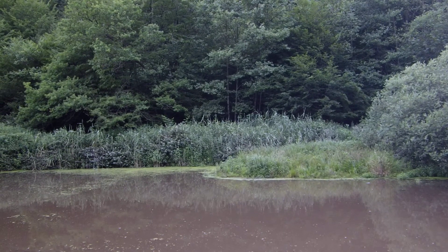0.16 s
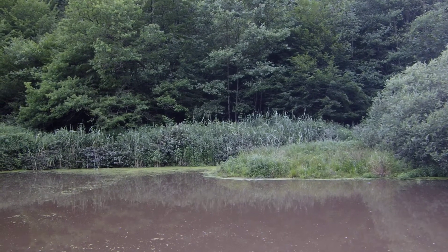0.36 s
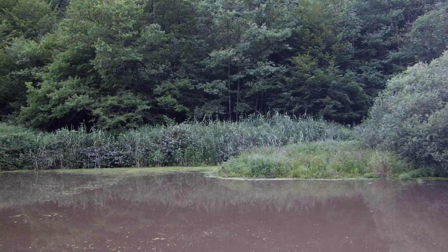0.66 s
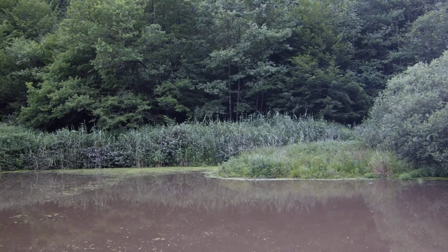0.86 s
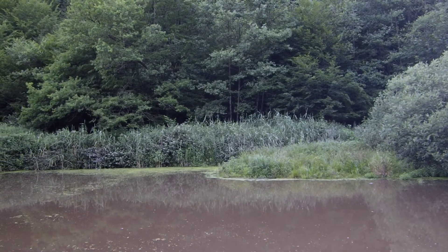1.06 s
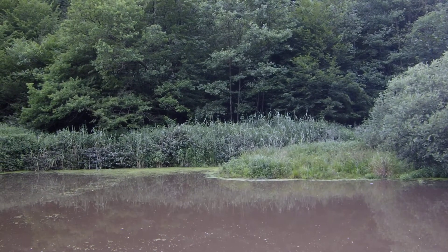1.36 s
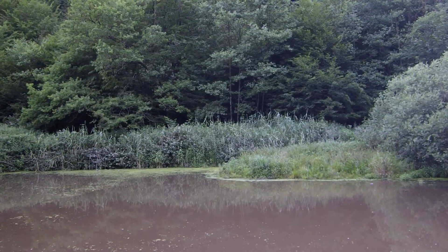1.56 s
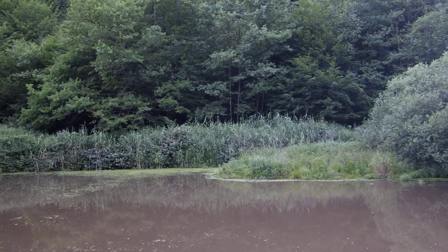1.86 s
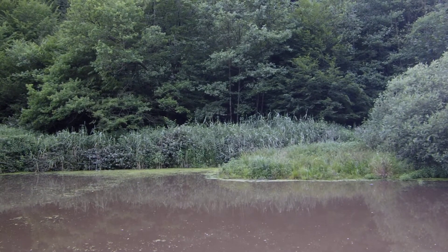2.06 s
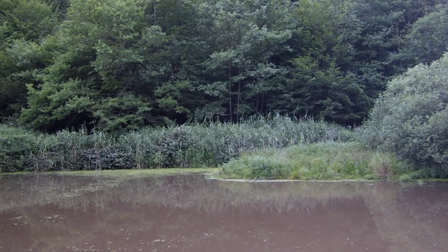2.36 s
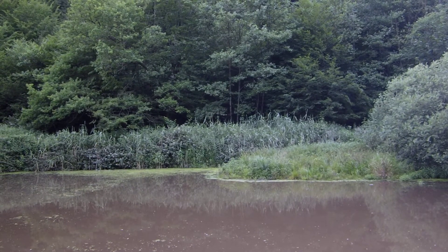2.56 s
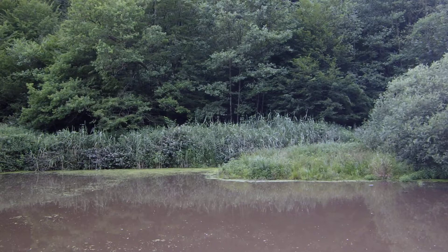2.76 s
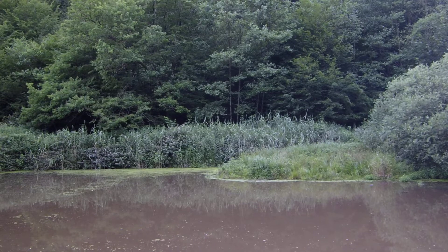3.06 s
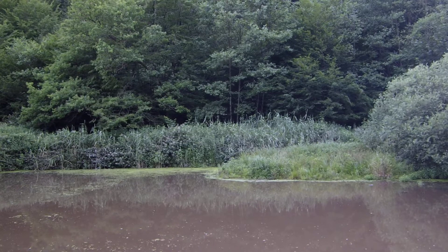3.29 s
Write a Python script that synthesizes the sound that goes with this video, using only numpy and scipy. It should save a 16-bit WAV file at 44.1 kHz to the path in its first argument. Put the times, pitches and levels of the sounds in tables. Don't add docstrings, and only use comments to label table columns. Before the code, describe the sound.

A mole cricket churrs steadily and loudly close by at a pond edge, faint birds behind

```python
import sys
import numpy as np
from scipy import signal
from scipy.fft import rfft, irfft
from scipy.io import wavfile
from scipy.ndimage import uniform_filter1d

SR = 44100
rng = np.random.default_rng(int(sys.argv[2]) if len(sys.argv) > 2 else 0)


def transcribe(signal):
    frames = np.atleast_2d(signal).T
    limited = np.clip(frames, -1, 1)
    pcm = np.round(limited * 32767).astype(np.int16)
    wavfile.write(sys.argv[1], SR, pcm)


def how_loud(loudness_db):
    steps = np.asarray(loudness_db, float) / 20
    return 10 ** steps


N = 151263
T = np.arange(N) / SR


def walk(rate):
    hold = int(SR / rate)
    held = np.repeat(rng.standard_normal(N // hold + 1), hold)
    return 1.3 * uniform_filter1d(uniform_filter1d(held, hold), hold)[:N]


def scatter(x, t60, wet_db):
    t = T[:SR // 2]
    tail = rng.standard_normal(len(t)) * how_loud(-60 * t / t60) * (t > .004)
    tail = tail / np.sqrt(np.sum(tail ** 2))
    return x + how_loud(wet_db) * signal.fftconvolve(x, tail)[:N]


def air_and_hiss():
    # f/Hz, level/dB per Hz
    air_points = [(25, -85), (120, -95), (400, -103), (1100, -106), (1400, -103), (2150, -103),
                  (2300, -108), (2800, -109)]
    # f/Hz, level/dB per Hz
    hiss_points = [(3600, -107), (4300, -115), (5000, -124), (6200, -123), (8000, -123), (10000, -119),
                   (13600, -116), (15700, -120)]
    swell_db, flicker_db = .3, .8
    whine_hz, whine_db = 9232, -87
    top_hz = 15745

    hz = np.maximum(np.fft.rfftfreq(N, 1 / SR), 1)
    point_hz, point_db = np.concatenate([np.array(air_points), np.array(hiss_points)]).T
    colour = how_loud(np.interp(np.log(hz), np.log(point_hz), point_db) + 18) * np.sqrt(SR / 2)
    colour = colour * hz / (hz + 12) * (hz < top_hz)
    noise = rfft(rng.standard_normal(N)) * colour

    out, swell = 0, walk(0.46)
    for octave in range(11):
        distance = np.clip(np.log2(hz / 20) - octave, -1 if octave else 0, 1)
        part = np.cos(np.pi / 2 * distance) ** 2
        outdoors = 1 / (1 + (20 * 2 ** octave / 5000) ** 2)
        moving_db = outdoors * (swell_db * swell + flicker_db * walk(7.98))
        out = out + irfft(noise * part, N) * how_loud(moving_db)
    return out + how_loud(whine_db) * np.sqrt(2) * np.sin(2 * np.pi * whine_hz * T)


def cricket():
    # t/s, lead/strokes
    wing_lead = [(0.0, 0.163), (0.15, 0.124), (0.3, 0.194), (0.45, 0.178), (0.6, 0.309), (0.75, 0.295),
                 (0.9, 0.414), (1.1, 0.427), (1.3, 0.428), (1.5, 0.445), (1.75, 0.366), (1.95, 0.496),
                 (2.15, 0.446), (2.4, 0.446), (2.6, 0.374), (2.85, 0.225), (3.1, 0.156), (3.43, 0.077)]
    strokes_per_s, beat_start = 49.862, .81
    attack_s, stroke_s, release_s, sag_db = .0029, .0089, .0021, -4.5
    wing_hz, wing_scatter_hz = 1463.7, 7.9
    rise_hz, rise_peak, fall_hz = 57.6, .72, 45
    stroke_jitter_s, stroke_scatter_db = .0003, .7
    song_db, rough = -35.4, .08

    count = strokes_per_s * T + np.interp(T, *np.array(wing_lead).T) + beat_start
    stroke = count.astype(int)
    chance = rng.standard_normal((stroke.max() + 1, 5))[stroke].T
    age = (count - stroke) / strokes_per_s - .001 - stroke_jitter_s * chance[0]
    age = np.maximum(age, 0)
    length = stroke_s * (1 + 0.023 * chance[1])
    along = age / length

    swelling = np.sin(np.pi / 2 * np.minimum(age / attack_s, 1)) ** 2
    sagging = how_loud(sag_db * np.minimum(along, 1) ** 2)
    dying = np.exp(-np.maximum(age - length, 0) / release_s)

    climb = rise_hz * np.minimum(along / rise_peak, 1)
    fall = fall_hz * np.clip((along - rise_peak) / 0.1494, 0, 1)
    hz = wing_hz + wing_scatter_hz * chance[2] + climb - fall
    ring = np.sin(2 * np.pi * (np.cumsum(hz) / SR + chance[3]))

    strength = how_loud(song_db + stroke_scatter_db * chance[4]) * (1 + rough * walk(500))
    return scatter(ring * swelling * sagging * dying * strength, .12, -14.5)


def frogs():
    # centre f/Hz, spread/Hz, level/dB, ring/s, change/dB once the birds fall quiet
    choruses = [(2030, 130, -66, .006, 1.0), (2800, 220, -68, .005, -4), (3580, 300, -65, .005, -3)]
    quiet_from_s, quiet_over_s, chorus_swell_db = 1.9, .3, 2.5

    total, t = 0, T[:SR // 20]
    quiet = np.clip((T - quiet_from_s) / quiet_over_s, 0, 1)
    for centre_hz, spread_hz, db, ring_s, change_db in choruses:
        out = np.zeros(N + SR)
        for place, pitch, size in rng.random((500, 3)):
            i = int(place * N)
            hz = centre_hz + spread_hz * (2 * pitch - 1)
            out[i:i + len(t)] += size * t * np.exp(-t / ring_s) * np.sin(2 * np.pi * hz * t)
        moving_db = db + change_db * quiet + chorus_swell_db * walk(4.98)
        total = total + out[:N] / out[:N].std() * how_loud(moving_db)
    return total


def birds():
    # t/s, f/Hz, length/s, level/dB
    whistles = [(.545, 2900, 0.018, -57), (.62, 2800, 0.034, -57), (.765, 3593, 0.038, -57),
                (.86, 4320, 0.012, -64), (.88, 3530, 0.041, -53.5), (.95, 3524, 0.036, -60),
                (.95, 2830, 0.013, -65), (1.01, 3392, 0.085, -58.5), (1.09, 3650, 0.032, -60),
                (1.2, 2850, 0.026, -68), (1.44, 3500, 0.036, -59), (1.475, 2880, 0.028, -58),
                (1.51, 2650, 0.029, -62), (1.52, 3580, 0.024, -63), (1.64, 3800, 0.028, -59),
                (1.65, 3400, 0.06, -66), (1.67, 2870, 0.02, -55), (1.73, 2850, 0.035, -58.5),
                (1.76, 2550, 0.027, -58), (1.96, 2880, 0.026, -71), (2.11, 3500, 0.028, -73),
                (2.3, 3500, 0.025, -67), (.1, 3595, 0.056, -59.5), (0.262, 3650, .04, -61),
                (0.432, 3540, .05, -59.5), (2.947, 3570, 0.048, -67)]
    glide, birds_db = -.04, -2.5
    trill_depth, trill_per_s, waver_depth = .6, 110, .045

    out = np.zeros(N)
    waver = np.cumsum(waver_depth * walk(trill_per_s)) / SR
    for start, hz, length, db in whistles:
        u = np.clip((T - start) / length, 0, 1)
        cycles = hz * (length * (u + glide * (u ** 2 - u)) + waver)
        out += how_loud(db) * np.sin(np.pi * u) * np.sin(2 * np.pi * cycles)
    trilled = out * (1 + trill_depth * walk(trill_per_s))
    return scatter(how_loud(birds_db) * trilled, .3, 4)


def knock(start, db, modes):
    contact_s, crack_db, crack_s = 0.00058, -16, 0.00084
    t = np.maximum(T - start, 0)
    ring = 0
    for k, (hz, mode_db, t60) in enumerate(modes):
        ring = ring + (-1) ** k * how_loud(mode_db - 60 * t / t60) * np.sin(2 * np.pi * hz * t)
    crack = how_loud(crack_db) * rng.standard_normal(N) * np.exp(-t / crack_s) * (t > 0)
    return how_loud(db) * (2 * ring * (1 - np.exp(-t / contact_s)) + crack)


def knocks():
    # f/Hz, level/dB, t60/s
    tap_modes = [(3500, -6, 0.012), (450, -2, .03), (696, -3, 0.017), (950, 1, 0.014), (1120, -4, 0.0093),
                 (2000, -4, 0.016), (2800, -12, 0.016), (4350, -7, 0.009), (4600, -13, 0.0075)]
    # f/Hz, level/dB, t60/s
    rap_modes = [(103.6, -9, 0.037), (472, -9, 0.026), (624, -9.5, 0.03), (880, -8.5, 0.015),
                 (1320, 0.5, 0.022), (2000, 3, 0.016), (1700, 1, .012), (2044, -8, 0.035),
                 (2790, -33, 0.019), (3560, -17, 0.016), (4270, -11.5, 0.011), (4600, -16, 0.0083),
                 (6670, -25, 0.0074)]
    return knock(2.6262, -37, tap_modes) + knock(2.7842, -25, rap_modes)


def scene():
    return (air_and_hiss() + cricket() + frogs() + birds() + knocks())[None]


def top_cut(x):
    return signal.sosfilt(signal.butter(12, 16410, fs=SR, output="sos"), x)


def record(dry):
    # f/Hz, width/Hz
    notches = [(3182, 475), (4070, 445), (5120, 440), (5674, 176), (7127, 410), (8177, 28)]
    dip_hz, dip_width_hz, dip_share = 2362, 350, 0.61

    dry = signal.sosfilt(signal.ellip(8, .2, 60, 15900, fs=SR, output="sos"), dry)
    dip_band = signal.lfilter(*signal.iirpeak(dip_hz, dip_hz / dip_width_hz, fs=SR), dry)
    x = dry - dip_share * dip_band
    for hz, width_hz in notches:
        x = signal.lfilter(*signal.iirnotch(hz, hz / width_hz, fs=SR), x)
    return top_cut(x)


dry = scene()
out = record(dry)
transcribe(out)
```